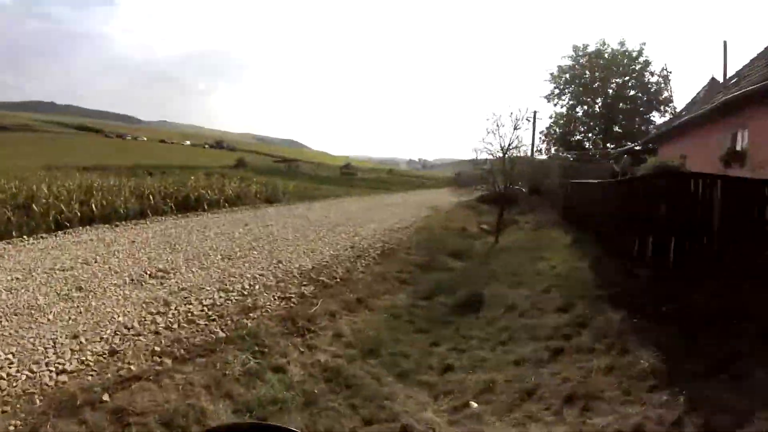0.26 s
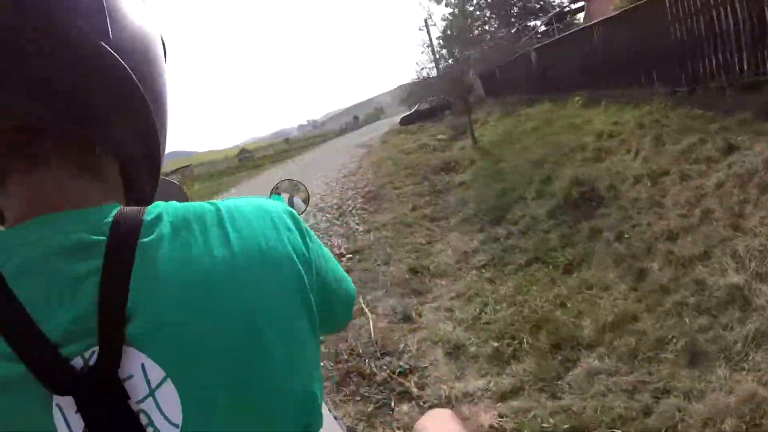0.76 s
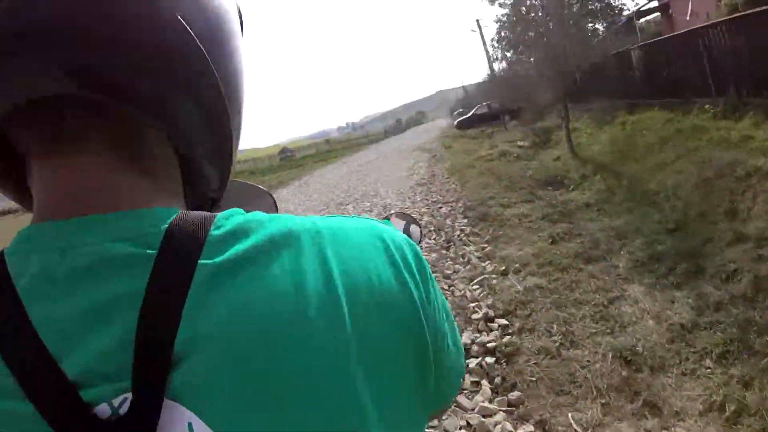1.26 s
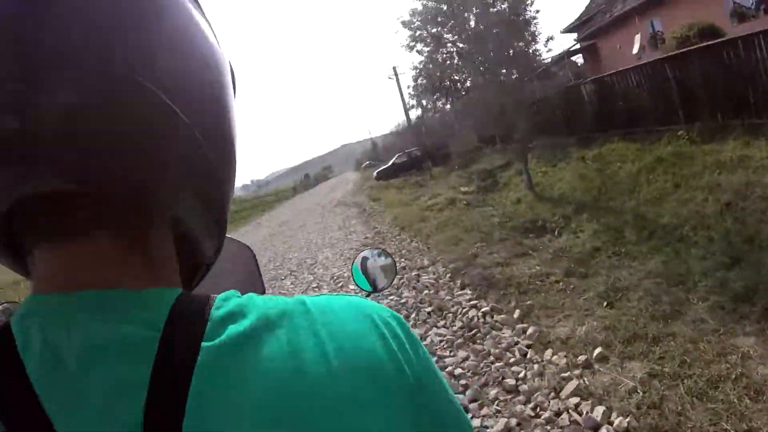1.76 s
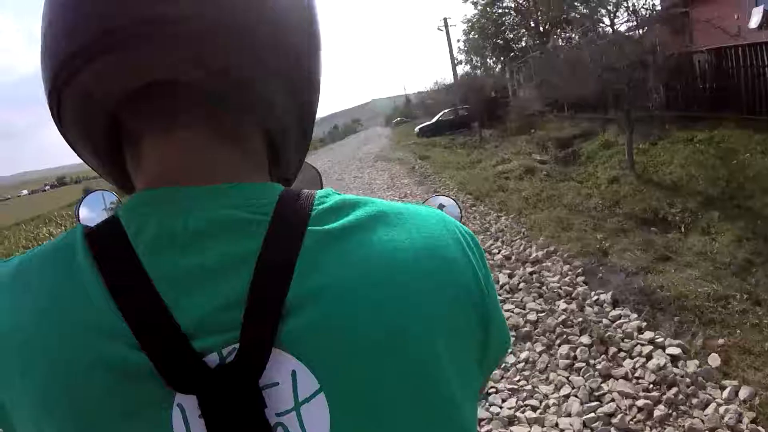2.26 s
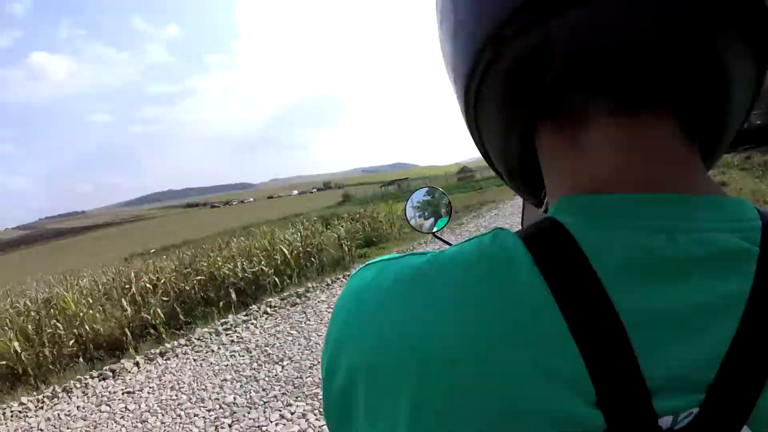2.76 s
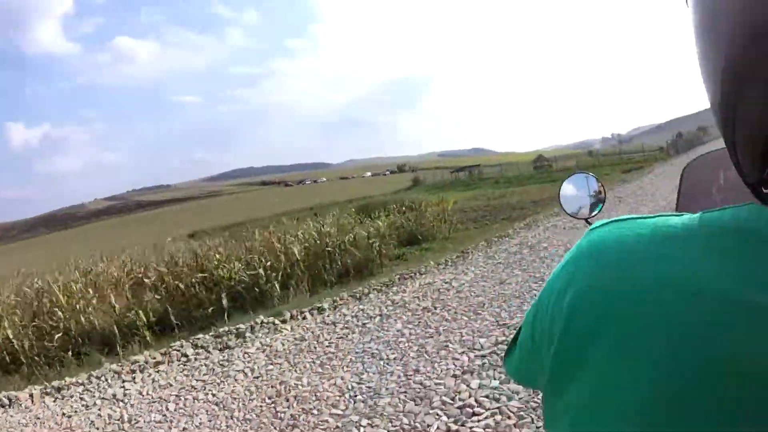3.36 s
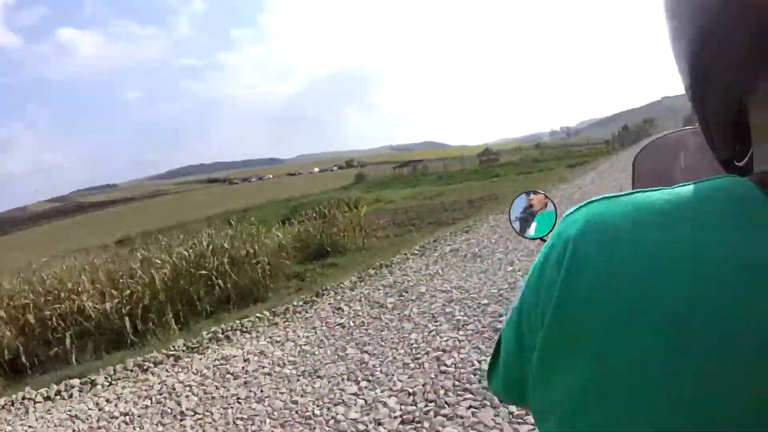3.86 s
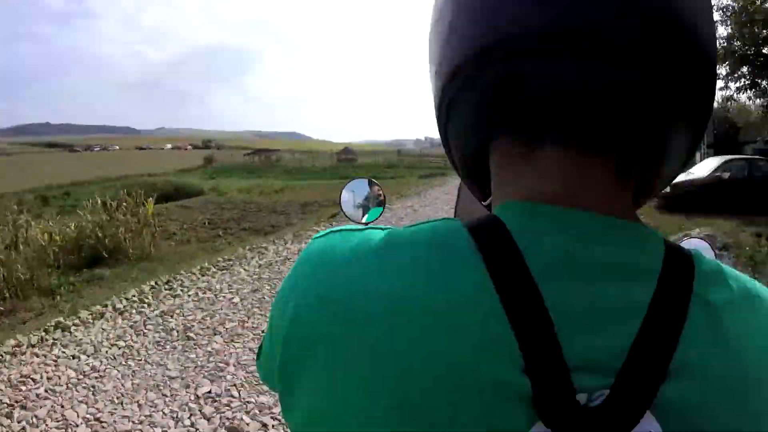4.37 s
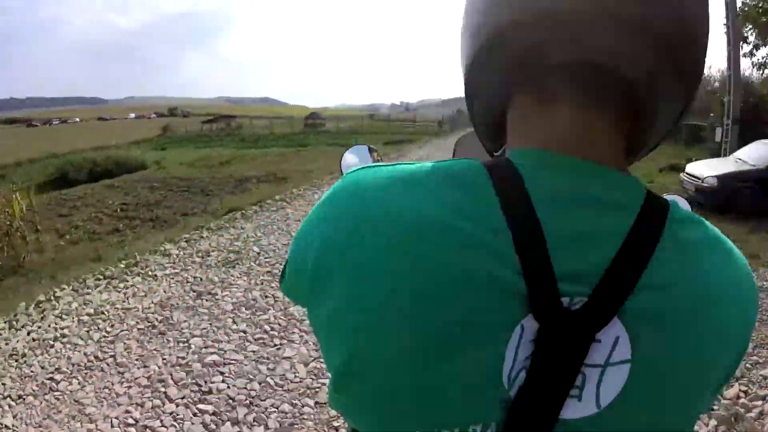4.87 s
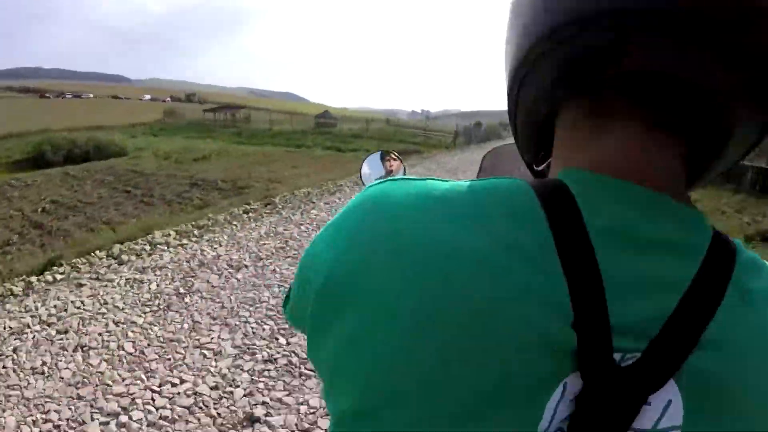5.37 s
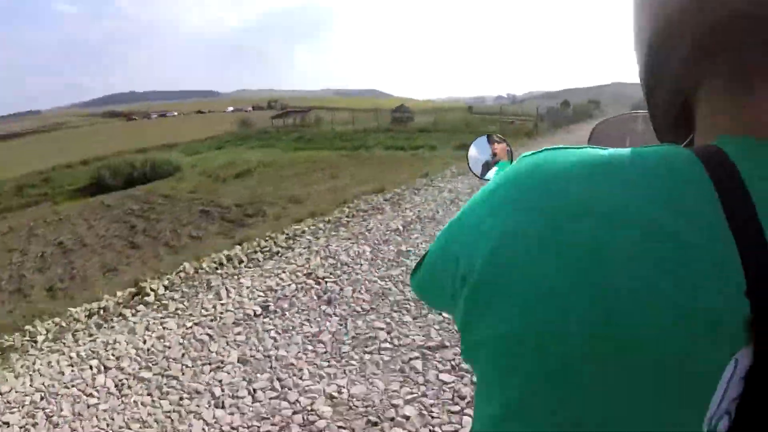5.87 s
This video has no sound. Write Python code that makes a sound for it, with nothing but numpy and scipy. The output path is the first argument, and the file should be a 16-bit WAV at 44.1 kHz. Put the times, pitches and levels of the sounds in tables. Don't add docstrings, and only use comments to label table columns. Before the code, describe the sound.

Passenger's-ear view of a small motorbike accelerating on loose stones, exhaust pulses quickening, pebbles pinging metal, low wind rumble and overloaded jolts.

```python
import sys
import numpy as np
from scipy import signal
from scipy.fft import rfft, irfft
from scipy.io import wavfile

SR = 44100
rng = np.random.default_rng(int(sys.argv[2]) if len(sys.argv) > 2 else 0)


def log_audio(samples):
    frames = np.atleast_2d(samples).T
    limited = np.clip(frames, -1, 1)
    pcm = np.round(limited * 32767).astype(np.int16)
    wavfile.write(sys.argv[1], SR, pcm)


def magnitude_from_level(level_db):
    exponent = np.asarray(level_db, float) / 20
    return 10 ** exponent


N = 269451

# f/Hz, width/Hz, level/dB
CASING = [(596, 110, -3.5), (913, 140, -11.5), (1025, 44, -5), (1272, 104, -0.5), (1796, 120, -1.5),
          (2045, 70, 1.5), (2630, 160, -2), (3061, 91, -4.5), (3380, 340, -10), (4160, 62, -21)]
# f/Hz, width/Hz, level/dB
GUARD = [(4280, 200, 12.5), (4730, 230, -0.5), (6110, 310, 7.5), (7580, 900, 4), (8156, 220, 11),
         (9500, 900, -7.5), (12200, 720, -28)]


def rms_one(x):
    return x / np.sqrt(np.mean(x ** 2) + 1e-20)


def in_time(rows):
    s, *columns = np.transpose(rows)
    return [np.interp(np.arange(N) / SR, s, column) for column in columns]


def swells(rows):
    t = np.arange(0, N + 32, 32) / SR
    curve = sum(top * np.exp(-.5 * ((t - s) / half) ** 2) for s, half, top in rows)
    return np.interp(np.arange(N) / SR, t, curve)


def drift(rate):
    r = np.exp(-80 * np.pi * rate / SR)
    slow = signal.lfilter([1], [1, -2 * r, r * r], rng.standard_normal(N // 40 + 2002))[2000:]
    return np.interp(np.arange(N) / 40, np.arange(len(slow)), rms_one(slow))


def coloured(spectrum):
    hz, db = np.transpose(spectrum)
    bins_hz = np.maximum(np.arange(N // 2 + 1) * SR / N, 1)
    gain = magnitude_from_level(np.interp(np.log(bins_hz), np.log(hz), db))
    return rms_one(irfft(rfft(rng.standard_normal(N)) * gain, N))


def resonate(x, hz, width):
    r = np.exp(-np.pi * width / SR)
    poles = [1, -2 * r * np.cos(2 * np.pi * hz / SR), r * r]
    return signal.lfilter([(1 - r * r) / 2, 0, (r * r - 1) / 2], poles, x + 1e-18)


def body(x, modes):
    return sum((-1) ** k * magnitude_from_level(db) * resonate(x, hz, width) for k, (hz, width, db) in enumerate(modes))


def exhaust(turns, per_s, levels_db, rough, uneven_db, gulp):
    # f/Hz, width/Hz, level/dB, part (0 bark, 1 thump, 2 rasp)
    silencer = [(99.3, 43.4, 5.5, 1), (124.4, 24, 4.5, 1), (187, 65, -13, 1), (239, 35.6, 5, 0),
                (293, 36, 13, 0), (417.6, 35.6, 5, 0), (615.5, 45, -2, 2), (666, 31.3, -3, 2)]
    at = np.flatnonzero(np.diff(np.floor(2 * turns))) + 1
    is_gulp = np.floor(2 * turns[at]) % 2
    size = np.where(is_gulp, gulp, 1) * np.sqrt(SR / per_s[at])
    puff = np.exp(-1.8 * (turns % 1)) * rng.standard_normal(N) * rough
    strength = magnitude_from_level(uneven_db * rng.standard_normal((len(at), len(silencer))))
    parts = np.zeros((3, N))
    for k, (hz, width, db, part) in enumerate(silencer):
        part = round(part)
        kick = np.zeros(N)
        kick[at] = strength[:, k] * size
        share = [1, .7, .7][part]
        drive = (kick + share * puff) / np.sqrt(1 + .27 * (share * rough) ** 2)
        rung = resonate(resonate(drive, hz, width), hz, 2.59 * width)
        parts[part] += (-1) ** k * magnitude_from_level(db) * rung
    return sum(magnitude_from_level(db) * rms_one(p) for db, p in zip(levels_db, parts))


def shake(turns, per_s, thump_db):
    orders = [(4, -2, 105, 14), (6, 5, 105, 16), (7, 1, 100, 20), (9, -3, 265, 45), (10, -2, 300, 40),
              (15, -8, 410, 80), (19, -8, 285, 200)]
    out = 0
    for order, db, frame_hz, loss_db in orders:
        off_db = -loss_db * np.log2(order * per_s / frame_hz) ** 2
        tone = np.sin(order * (2 * np.pi * turns + 1.8))
        out = out + magnitude_from_level(db + off_db + 1.5 * drift(3)) * tone
    return out * magnitude_from_level(thump_db)


def gears(turns, per_s, mesh_db, through_db, beat):
    # multiple of the firing rate, level/dB, f/Hz where the shaft sings, breadth/octaves
    meshes = [(26.9, 7, 786, 0.18), (40.6, 1, 1260, 0.14), (41.1, -3, 670, .15), (54.1, 3.5, 1120, 0.24),
              (53.6, -3, 1680, 0.06), (79, 3, 1835, .06), (79.5, -1.5, 2520, .12), (75, 2.5, 1990, 0.25),
              (74.5, 6.5, 1235, 0.22), (71.8, 3, 1776, 0.034)]
    out = 0
    load = 1 + beat * np.cos(2 * np.pi * turns)
    uneven = 0.0022 * np.sin(2 * np.pi * turns)
    for order, db, sings_hz, breadth in meshes:
        wobble = order * (0.0028 * drift(50) + uneven)
        level_db = mesh_db + db - 6 * (np.log2(order * per_s / sings_hz) / breadth) ** 2
        tone = np.sin(2 * np.pi * (order * turns + wobble))
        out = out + magnitude_from_level(level_db) * load ** min(order / 50, 1) * tone
    return body(out, CASING) + magnitude_from_level(through_db) * out


def clatter(turns, throb, ring_db):
    # f/Hz, level/dB
    roar = [(88, -33), (150, -1), (178, -3), (286, 2.5), (505, -5), (2260, -12), (2630, -13), (5420, -43),
            (8230, -54), (12300, -100), (14000, -50)]
    swell = (1 + throb * np.cos(2 * np.pi * turns)) * magnitude_from_level(0.96 * drift(7.2))
    white = rng.standard_normal((2, N)) * swell
    rung = 0
    for k, (hz, width, db) in enumerate(CASING):
        rung = rung + magnitude_from_level(db + 2.8 * drift(27)) * resonate(white[k % 2], hz, width)
    return rms_one(coloured(roar) * swell + magnitude_from_level(ring_db) * rms_one(rung))


def gravel(per_s, spread_db):
    born = rng.random(N) < per_s * magnitude_from_level(5 * drift(12)) / SR
    size = magnitude_from_level(spread_db * np.minimum(rng.exponential(1, N), 3.0))
    grains = born * size * rng.choice([-1, 1], N)
    return rms_one(body(rms_one(grains) * 0.58 + rng.standard_normal(N), GUARD))


def scuffs():
    # t/s, half length/s, f/Hz, level/dB
    grinds = [(0.067, 0.062, 1450, -63), (0.236, 0.061, 1250, -59), (0.498, .07, 2150, -63),
              (.67, 0.099, 1220, -61), (0.71, 0.022, 2550, -60), (.78, 0.014, 950, -55),
              (0.865, 0.018, 2200, -60), (1.465, .035, 2600, -57), (1.454, .03, 1300, -62),
              (3.4, 0.06, 2050, -57), (3.953, 0.2, 1550, -55), (5.95, 0.24, 2450, -53)]
    width_hz = 130
    grit = rng.standard_normal(N) * magnitude_from_level(3 * drift(60))
    unit = np.sqrt(SR / np.pi / width_hz)
    out = 0
    for s, half, hz, db in grinds:
        out = out + swells([(s, half, unit * magnitude_from_level(db))]) * resonate(grit, hz, width_hz)
    return out


def stones(rise_s, decay_s, sizzle_db):
    # t/s, peak level/dB, brightness/dB
    hits = [(1.39, -43, -5), (1.4122, -40, -29), (1.4634, -31, -26), (1.4965, -42, -5), (1.574, -50, -16),
            (1.6781, -33, -25), (1.7275, -32.5, -21), (1.8796, -33, -19), (1.983, -32.5, -27),
            (2.0424, -30, -17), (2.7164, -25.5, -20), (2.9343, -34.5, -9.5), (2.989, -34.5, -19),
            (3.3772, -29.5, -29), (3.5409, -33, -21), (4.001, -33.5, -25), (4.0347, -54, -15),
            (4.08, -31, 0), (4.2226, -34.5, -39), (4.2916, -28, -16), (4.3814, -23, -17),
            (4.6214, -33, -11), (4.7176, -25, -23), (4.9935, -28, -19), (5.1163, -32, -23),
            (5.333, -28, -25), (5.651, -24.5, -9.5), (5.747, -29, -7), (5.814, -21.5, -2.5),
            (5.887, -21.5, -23)]
    s, peak_db, bright_db = np.transpose(hits)
    at = ((s - .003) * SR).astype(int)
    dull, bright = np.zeros((2, N))
    dull[at] = magnitude_from_level(peak_db - 6.0)
    bright[at] = magnitude_from_level(peak_db + bright_db - 3.0)
    up, down = np.exp(-1 / (rise_s * SR)), np.exp(-1 / (decay_s * SR))
    dull, bright = signal.lfilter([1 - up], np.convolve([1, -up], [1, -down]), [dull, bright])
    rattle = magnitude_from_level(2.8 * rng.standard_normal(N // 64 + 1).repeat(64)[:N])
    a, b = rng.standard_normal((2, N)) * rattle
    low = body(a * dull, CASING) / np.std(body(a, CASING))
    high = body(b * bright, GUARD) / np.std(body(b, GUARD))
    return low + high + magnitude_from_level(sizzle_db) * resonate(a * bright, 13000, 2500)


def bumps(air):
    # t/s of crest, level/dB, f/Hz, rise/s, decay/s
    blows = [
        (1.500, 3, 50.8, 0.0059, 0.0081),
        (1.835, -19, 41.7, 0.0051, 0.011),
        (4.850, -9.5, 43, 0.0087, 0.018),
        (5.688, -4.5, 45.6, 0.0079, 0.017),
        (5.791, -11, 40.3, 0.012, 0.0334),
        (5.817, -27, 40, 0.013, 0.015),
        (5.866, -10.5, 37.3, 0.0093, 0.0086),
        (5.949, -20, 195, 0.001, 0.0033),
        (5.638, -32, 90, 0.015, 0.016),
    ]
    out = np.zeros(N)
    for s, db, hz, rise, decay in blows:
        t = np.arange(N) / SR - s
        build_up = np.exp(-.5 * (t / rise) ** 2)
        die_away = np.exp((.002 - np.hypot(t, .002)) / decay)
        envelope = magnitude_from_level(db) * np.where(t < 0, build_up, die_away)
        out += envelope * np.cos(2 * np.pi * hz * t)
        air = air / (1 + 6 * envelope)
    return out + air


def airflow():
    # t/s, strength/dB, fineness of the eddies/dB
    flow = [(0, -52, 5), (.3, -54, 10), (.6, -47, 3.5), (.9, -24.5, -4), (1.2, -38, 3.5), (1.5, -28, -3),
            (1.9, -31, -6), (2.35, -36.5, 2.5), (2.8, -33.5, 0), (3.3, -29.5, -3.5), (3.7, -28, 0.5),
            (4.3, -30, 0.5), (4.7, -23.5, -1.5), (5.05, -34, 4.5), (5.45, -34, 8.5), (5.75, -21, -14.5),
            (6.0, -32, 4.5), (6.11, -32.5, -6)]
    # t/s, half length/s, level/dB, size (0 sway, 1 buffet, 2 flutter)
    eddies = [(0.373, 0.24, 11, 0), (0.54, 0.16, 14, 2), (0.784, 0.14, -6, 1), (1.1, 0.017, 8.5, 2),
              (1.345, 0.048, -5.5, 1), (1.48, .04, 16, 1), (1.789, 0.036, 5, 0), (2.54, 0.045, -3, 1),
              (3.27, 0.04, 6, 2), (3.75, .04, -1, 0), (3.768, 0.036, 8.5, 1), (4.16, 0.1, 4, 0),
              (4.39, 0.21, 3.5, 1), (4.44, .06, 1, 2), (4.66, 0.044, -26, 1), (4.782, 0.058, -1.5, 0),
              (4.972, 0.071, -4, 0), (5.27, .07, 7.5, 0), (5.534, 0.063, -18, 1), (5.59, 0.033, 2, 0),
              (5.7, 0.022, 1, 2), (5.818, 0.037, 16, 1)]
    strength_db, fine_db = in_time(flow)
    steady_db = [2.5 - 0.27 * fine_db, -5, -7.5 + fine_db]
    levels_db = []
    for size, db in enumerate(steady_db):
        single = [row[:3] for row in eddies if round(row[3]) == size]
        levels_db.append(strength_db + db + swells(single))
    return levels_db


def wind(sway_db, buffet_db, flutter_db):
    # f/Hz, level/dB
    sway_spectrum = [(3, -13.5), (8, -19.5), (13, 6.5), (19, -8.5), (30, -42), (100, -120)]
    buffet_spectrum = [(8, -77), (12, -24.5), (20, 20), (32, 7), (45, 7.5), (100, -64), (300, -120)]
    flutter_spectrum = [(15, -57.5), (25, 2), (42, -2.5), (60, -4.5), (80, -15.5), (120, -20.5), (200, -30),
                        (500, -120)]
    sway = magnitude_from_level(sway_db + 3.5) * coloured(sway_spectrum)
    buffet = magnitude_from_level(buffet_db + 2.0 + 3.3 * drift(0.65)) * coloured(buffet_spectrum)
    flutter = magnitude_from_level(flutter_db + 3.5 + 1.4 * drift(8.8)) * coloured(flutter_spectrum)
    return sway + buffet + flutter


def hiss(level_db):
    # f/Hz, level/dB
    hiss_spectrum = [(40, -27), (300, 12), (9000, -5), (13000, -6.5), (15000, -7), (17000, -90.5)]
    return magnitude_from_level(level_db) * coloured(hiss_spectrum)


def scene():
    # t/s, firings per s
    speed = [(0, 12.3), (.48, 14.8), (.95, 13.1), (1.9, 13.2), (2.62, 14.6), (3.05, 15.8), (3.59, 19.0),
             (4.99, 26.1), (5.65, 29.7), (5.9, 31.0), (6.11, 31.7)]
    # t/s, load above idle/dB
    throttle = [(0, -1), (.2, -12), (.36, -2), (.9, 2.5), (1.5, 0), (2.2, 1), (2.8, 4.5), (3.5, 10),
                (4.5, 9), (5.1, 11.5), (5.6, 11.5), (6.11, 15)]
    # t/s, half length/s, dull swell/dB, bright swell/dB
    patches = [(0.634, 0.078, -2, -2), (1.349, 0.011, 6.5, 5), (1.46, 0.044, 5, -7), (1.547, 0.032, -3, .5),
               (1.583, 0.01, 4, 10.5), (1.7, 0.049, 4, 2), (1.81, 0.018, 5.5, 7), (1.977, 0.062, 6.5, 2),
               (2.17, 0.049, 4.5, -3), (2.333, 0.3, 1, 1.5), (3.304, 0.6, 0, 1), (4.234, 0.0068, 6.5, -3),
               (4.403, 0.057, 2.5, .5), (5.695, 0.073, 3, 2), (5.84, 0.012, 4, 5), (6.07, 0.041, -0.5, 0)]
    (per_s,), (load_db,) = in_time(speed), in_time(throttle)
    turns = np.cumsum(per_s) / SR + .55
    octaves = np.log2(per_s / 13)

    def answer(idle_db, by_load, by_speed):
        return idle_db + by_load * load_db + by_speed * octaves

    bark_db, thump_db, rasp_db = answer(-56, 1, 0.5), answer(-50.5, 0.31, -2.5), answer(-75, 1, 9.8)
    clatter_db, gravel_db, mesh_db = answer(-55, 0.33, 4.83), answer(-71.5, .2, 9.4), answer(-59.5, 0.52, 4.8)
    rasp_db = rasp_db + 5 * np.exp(-.5 * (np.log2(per_s / 27.8) / .07) ** 2)
    rough_idle, rough_pulling = 2.6, .22
    rough = rough_pulling + (rough_idle - rough_pulling) / (1 + (per_s / 14.6) ** 12)
    dull_db, bright_db = [swells(np.array(patches)[:, [0, 1, k]]) for k in (2, 3)]

    engine = exhaust(turns, per_s, [bark_db, thump_db, rasp_db], rough, uneven_db=1.3, gulp=.08)
    engine += magnitude_from_level(clatter_db + dull_db + 2.5) * clatter(turns, throb=0.022, ring_db=-4.5)
    engine += magnitude_from_level(2.5) * shake(turns, per_s, thump_db)
    engine += gears(turns, per_s, mesh_db, through_db=-9, beat=.8)
    road = magnitude_from_level(gravel_db + bright_db - 1.0) * gravel(per_s=450, spread_db=15.0) + scuffs()
    far_top = signal.butter(4, 11400, fs=SR, output="sos")
    far = signal.sosfilt(far_top, engine + road)
    near = stones(rise_s=0.0046, decay_s=0.0036, sizzle_db=-10) + bumps(wind(*airflow()))
    return (far + near + hiss(level_db=-70))[None]


def low_pass(x):
    return signal.sosfilt(signal.butter(12, 15060, fs=SR, output="sos"), x)


def record(dry):
    dip_s, width_s = .338, 0.003
    dip = 1 - 0.88 * np.exp(-.5 * ((np.arange(N) / SR - dip_s) / width_s) ** 2)
    overloaded = np.clip(dry * dip, -.99, .99)
    return low_pass(overloaded)


dry = scene()
out = record(dry)
log_audio(out)
```